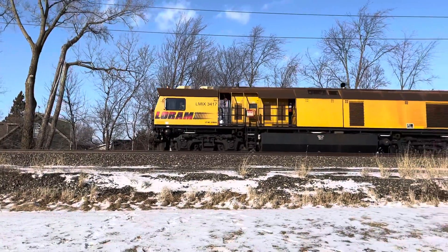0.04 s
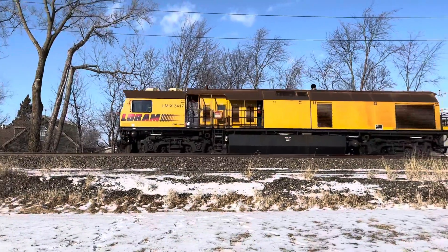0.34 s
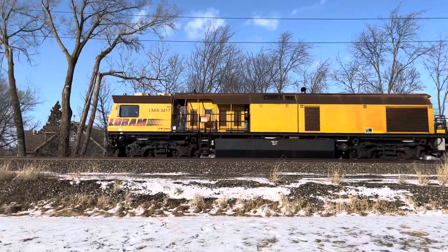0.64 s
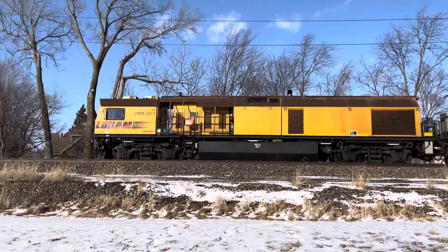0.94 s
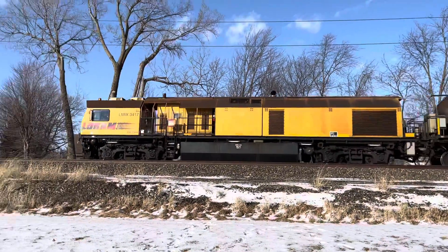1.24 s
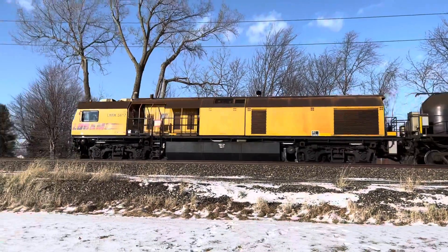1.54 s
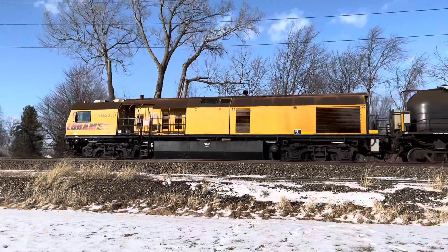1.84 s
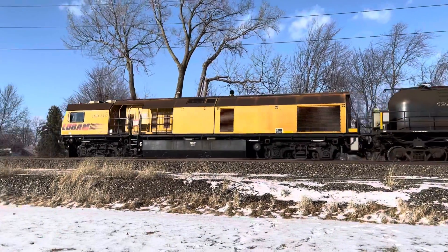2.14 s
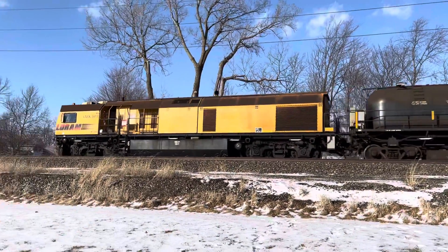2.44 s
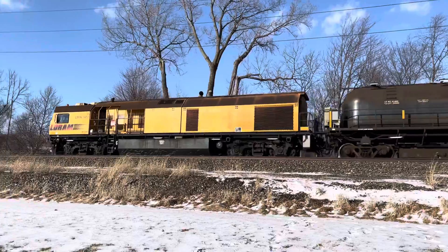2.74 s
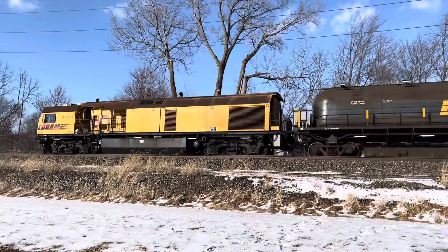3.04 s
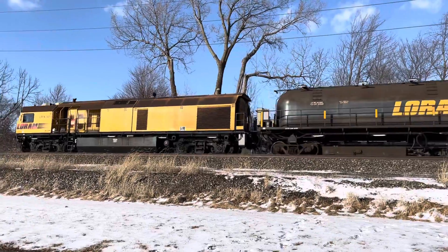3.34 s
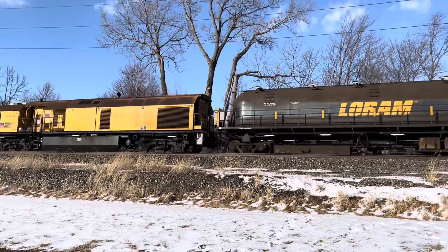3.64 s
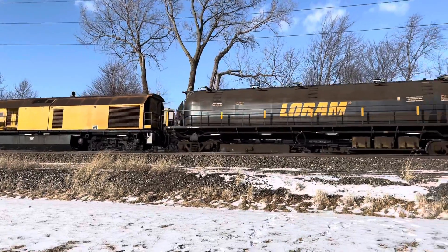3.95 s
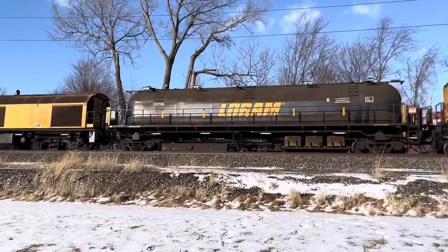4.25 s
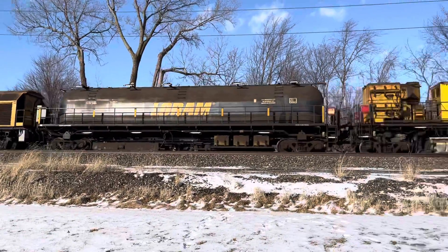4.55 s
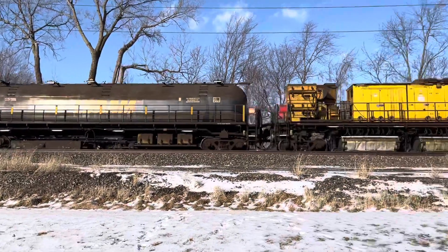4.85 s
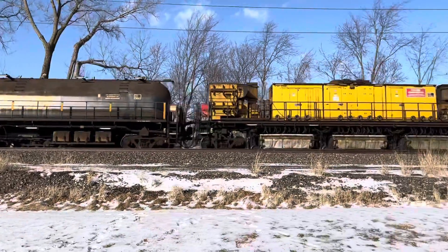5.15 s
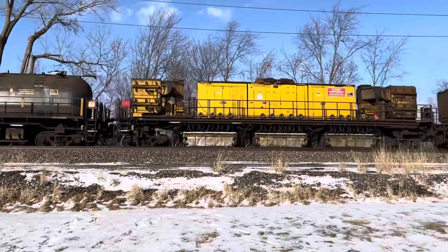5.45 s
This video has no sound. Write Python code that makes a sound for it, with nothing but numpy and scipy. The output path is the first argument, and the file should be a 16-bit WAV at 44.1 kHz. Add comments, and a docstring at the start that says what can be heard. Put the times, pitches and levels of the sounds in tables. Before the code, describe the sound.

A short gust of wind buffets the microphone and ends in a pop. A diesel locomotive passes in the open with a low, throbbing drone and roaring fans. Its running gear knocks and clanks early on, while steel wheels hiss, ring and scrape on the rails. Compressed air spurts briefly twice. As the following cars roll by, a generator's hum and buzz grow louder.

```python
"""Diesel work train passing

A locomotive, a water tank car and a machinery car with a generator roll across a snowy field.
A gust buffets the microphone and ends in a pop. The exhaust throbs at multiples of the crank rate,
fans and bodywork roar, wheels hiss, ring and scrape on the rails, and the running gear knocks.
Valves spurt compressed air; the generator's hum and buzz draw near last."""
import sys
import numpy as np
from scipy import signal
from scipy.fft import rfft, irfft, next_fast_len
from scipy.io import wavfile
from scipy.ndimage import map_coordinates

SR = 44100
rng = np.random.default_rng(int(sys.argv[2]) if len(sys.argv) > 2 else 0)


def store_wav(level_fs):
    """Save 16-bit WAV to argv[1]."""
    pcm = np.round(np.clip(np.atleast_2d(level_fs), -1, 1) * 32767)
    wavfile.write(sys.argv[1], SR, pcm.T.astype(np.int16))


N = 250929
TIME = np.arange(N) / SR
FFT_SIZE = next_fast_len(N, True)
BINS_HZ = np.maximum(np.arange(FFT_SIZE // 2 + 1) * SR / FFT_SIZE, 1)
SPEED_M_PER_S, DISTANCE_M, SOUND_M_PER_S = 5.0, 10.0, 343


def from_db(db):
    """Decibels to gain."""
    return 10 ** (np.asarray(db) / 20)


def unit_rms(x):
    """Scale to unit power."""
    return x / np.sqrt(np.mean(x ** 2) + 1e-20)


def by_hz(points):
    """A curve read at every frequency bin."""
    hz, value = np.transpose(points)
    return np.interp(np.log(BINS_HZ), np.log(hz), value)


def drift(rate_hz):
    """Slow random wander, rms 1."""
    spectrum = rfft(rng.standard_normal(FFT_SIZE)) / (1 + (BINS_HZ / rate_hz) ** 4)
    return unit_rms(irfft(spectrum, FFT_SIZE)[:N])


def swell(peak_s, half_length_s):
    """A smooth rise and fall of height 1."""
    return np.exp(-((TIME - peak_s) / half_length_s) ** 2)


def swells_db(rows):
    """Brief changes of level, summed."""
    return sum(db * swell(peak_s, half_length_s) for peak_s, half_length_s, db in rows)


def past_m(abreast_s):
    """How far a source has rolled beyond the microphone."""
    return SPEED_M_PER_S * (TIME - abreast_s)


def passing(abreast_s, level_db, focus):
    """Gain of a source going by; focus 1 spreads evenly, more beams sideways."""
    return from_db(level_db) * (DISTANCE_M / np.hypot(DISTANCE_M, past_m(abreast_s))) ** focus


def doppler_cycles(hz, abreast_s):
    """Cycles of a steady source as they arrive: sharp while it nears, flat once past."""
    return hz * (TIME - np.hypot(DISTANCE_M, past_m(abreast_s)) / SOUND_M_PER_S)


# Likeness of the two microphone ports: freq_hz, coherence (clipped to 0-1)
PORT_COHERENCE = [(60, 0.6), (125, 0.9), (250, 0.87), (500, 0.82), (1000, 0.46), (1450, 0.08), (2000, 0.95),
                  (4000, 0.72), (6500, 0.14), (8300, 2.5), (10000, -0.1), (12000, 1.5), (14000, 5)]

def noise(spectrum_db, flutter_db, coherence=PORT_COHERENCE):
    """Stereo turbulence of a given colour, fluttering in level; rms 1."""
    mid, side = rfft(rng.standard_normal((2, FFT_SIZE)))
    alike = np.clip(by_hz(coherence), 0, 1)
    ports = np.sqrt(1 + alike) * mid + np.sqrt(1 - alike) * side * [[1], [-1]]
    coloured = irfft(ports * from_db(spectrum_db), FFT_SIZE)[:, :N]
    return unit_rms(coloured * from_db(flutter_db * drift(rate_hz=21)))


def ring(force, hz, t60_s):
    """One damped mode; a unit click sets a sine of height 1 ringing."""
    radius, step_rad = from_db(-60 / (t60_s * SR)), 2 * np.pi * hz / SR
    feedback = [1, -2 * radius * np.cos(step_rad), radius ** 2]
    return signal.lfilter([0, np.sin(step_rad)], feedback, force + 1e-18)


def order_tone(cycles, order, wobble, wobble_hz=4):
    """One multiple of a machine's rate, wavering in phase and strength; rms about 1."""
    angle = 2 * np.pi * (order * cycles + rng.random()) + wobble * drift(wobble_hz)
    return np.sqrt(2) * np.sin(angle) * np.exp(.5 * wobble * drift(wobble_hz))


def overtones(cycles, orders, lifts, wobble, wobble_hz):
    """The tones of one shaft; now one, now another stands out."""
    out = 0
    for order, level_db in orders:
        lift_db = swells_db((s, half_s, db) for s, half_s, lifted, db in lifts if lifted == order)
        out = out + from_db(level_db + lift_db) * order_tone(cycles, order, wobble, wobble_hz)
    return out


# Gusts: peak_s, half_length_s, level_db
GUSTS = [(0.008, 0.036, -8), (0.062, 0.027, -13), (0.095, 0.021, -15), (0.149, 0.026, -14),
         (0.195, 0.022, -6.5), (0.237, 0.018, -13.5), (0.296, 0.026, -11), (0.345, 0.03, -15.5)]
# Eddy spectrum: freq_hz, density_db
WIND_SPECTRUM = [(20, -18), (40, -5), (75, 3.5), (120, 0.5), (180, -5.5), (260, -4), (350, -10.5),
                 (550, -13.5), (900, -22.5), (2000, -36.5), (5000, -72)]
# Likeness of the eddies at the ports: freq_hz, coherence
WIND_COHERENCE = [(50, 1), (130, 0.7), (400, 0.65)]
# Pops as the gust lets go: start_s, level_db
POPS = [(0.366, -10), (0.3694, 2.5), (0.3711, -5)]
# Pop resonances: pitch_hz, gain_db, t60_s
POP_MODES = [(560, -2, 0.0099), (1000, -2, 0.0042), (1400, -12, 0.003)]

def wind():
    """Lumpy eddies buffet the ports; the sharpest ones pop."""
    force = sum(from_db(db) * swell(peak_s, half_length_s) for peak_s, half_length_s, db in GUSTS)
    eddies = force * noise(by_hz(WIND_SPECTRUM), flutter_db=1, coherence=WIND_COHERENCE)
    clicks = np.zeros(N)
    for start_s, level_db in POPS:
        clicks[round(start_s * SR)] = from_db(level_db)
    pops = sum(from_db(db) * ring(clicks, hz, t60_s) for hz, db, t60_s in POP_MODES)
    soften = signal.butter(2, 2200, fs=SR, output="sos")
    return eddies + signal.sosfilt(soften, pops)


# Weaker tones of the uneven cylinders: order, level_re_drone_db
CRANK_ORDERS = [(2, -33), (3, -26), (7, -17.5), (8, -23.5), (9, -27.5), (11, -30.5), (12, -31), (16, -31.5),
                (17, -29), (21, -31), (24, -37)]
# Crank tones standing out: peak_s, half_length_s, order, lift_db
CRANK_LIFTS = [(3.5, 0.3, 24, 14), (4.053, 0.3, 16, 13.5), (4.294, 0.21, 12, 13.5)]
# Dips in the drone: centre_s, half_length_s, depth_db
DRONE_DIPS = [(0.02, 0.07, 17), (0.45, 0.12, 11.5), (3.99, 0.055, 2.5), (4.87, 0.085, 12), (5.27, 0.07, 8),
              (5.72, 0.15, 5)]
# Lulls in the throb: centre_s, half_length_s, depth_db
BEAT_DIPS = [(0.52, 0.1, 15), (2.6, 0.48, 7.5)]
# Exhaust gas spectrum: freq_hz, density_db
RUMBLE_SPECTRUM = [(20, -35), (35, -22), (46, -4), (62, -2), (85, 1), (115, -0.5), (150, -5.5), (200, -9.5),
                   (300, -29.5), (600, -82)]
# Swells in the rumble: peak_s, half_length_s, lift_db
RUMBLE_SWELLS = [(1.55, 0.17, 0.5), (1.85, 0.074, 5), (2.46, 0.081, 6.5), (4.85, 0.09, 0.5),
                 (5.67, 0.042, 6)]

def exhaust(crank_hz=14.93, drone_order=4, beat_order=5, abreast_s=2.283):
    """The drone beats once a turn against its neighbouring orders; gas puffs out of both engines."""
    turns = doppler_cycles(crank_hz, abreast_s)
    drone = order_tone(turns, drone_order, wobble=0.017)
    uneven = overtones(turns, CRANK_ORDERS, CRANK_LIFTS, wobble=0.12, wobble_hz=4)
    drone_gain = passing(abreast_s, level_db=-10.5, focus=1) * from_db(-swells_db(DRONE_DIPS))
    beat = order_tone(turns, beat_order, wobble=0.09)
    beat_gain = passing(abreast_s=2.44, level_db=-19, focus=0.88) * from_db(-swells_db(BEAT_DIPS))
    diesel_flow = passing(abreast_s=2.8, level_db=-23, focus=0.83)
    generator_flow = passing(abreast_s=5.6, level_db=-22, focus=3.6)
    flow = np.hypot(diesel_flow, generator_flow) * from_db(swells_db(RUMBLE_SWELLS))
    puffs = 1 + 0.2 * np.sin(2 * np.pi * drone_order * turns)
    rumble = flow * puffs * noise(by_hz(RUMBLE_SPECTRUM), flutter_db=0.5)
    return drone_gain * (drone + uneven) + beat_gain * beat + rumble


def echo_ripple_db(echo_db, count):
    """Short reflections off ballast and steel sides ripple the spectrum."""
    delays_s = rng.uniform(0.002964, .025, (count, 1))
    paths = 1 + from_db(echo_db) * np.exp(-2j * np.pi * BINS_HZ * delays_s).sum(axis=0)
    return 20 * np.log10(np.abs(paths) + 1e-3)


# Fan and panel spectrum: freq_hz, density_db
ROAR_SPECTRUM = [(90, -50), (170, -5), (260, -1), (400, -1.5), (520, -3.5), (750, -4), (950, -7.5),
                 (1500, -8.5), (2200, -9.5), (2900, -14.5), (4000, -25.5), (7000, -80)]
# Resonances of each part of the train: centre_hz, width_hz, peak_db
ENGINE_BAY = [(296, 19, 6), (380, 43, 2), (570, 33, 3), (728, 38, 0.5), (900, 81, -5.5), (1066, 510, 5),
              (1500, 60, -3), (2030, 100, 2.5), (2280, 110, -1), (2650, 230, 4), (2800, 120, -8)]
ENGINE_SIDE = [(300, 18, 3.5), (440, 130, 2), (574, 50, 3), (740, 56, 1.5), (910, 90, -6.5),
               (1110, 560, 2.5), (1500, 60, 1), (2030, 100, 2), (2280, 120, -1), (2640, 250, 4),
               (2760, 120, -4)]
RADIATOR = [(246, 25, 3.5), (400, 99, 1), (563, 50, 5.5), (650, 40, 4), (753, 60, 3.5), (835, 54, 2),
            (900, 70, -3), (1266, 260, 7), (1530, 110, -5), (1950, 200, 2.5), (2540, 290, 6),
            (3100, 120, 6), (3470, 220, 3.5), (3930, 180, -7)]
TANK_CAR = [(420, 200, -4.5), (575, 40, 5.5), (750, 70, 3), (844, 120, 3), (1170, 400, -2), (1980, 710, -7)]
MACHINE_CAR = [(398, 150, -1.5), (600, 70, -2), (730, 110, 2.5), (820, 240, 2), (1500, 320, 2),
               (2460, 370, 4)]
# The parts going by in turn: abreast_s, level_db, left_over_right_db
PART_PASSES = [(0.4, -25, -1), (1.501, -22.5, -2), (2.4, -24, -1), (3.4, -23, -1), (4.399, -25.5, 4),
               (5.4, -24.5, 1)]

def bodywork():
    """Fans and panels roar; each part colours the sound while abreast, then fades into the next."""
    parts = [ENGINE_BAY, ENGINE_BAY, ENGINE_SIDE, RADIATOR, TANK_CAR, MACHINE_CAR]
    abreast_s = [row[0] for row in PART_PASSES]
    out = 0
    for (_, level_db, pan_db), modes, own_turn in zip(PART_PASSES, parts, np.eye(len(parts))):
        peaks_db = sum(db / (1 + (2 * (BINS_HZ - hz) / width_hz) ** 2) for hz, width_hz, db in modes)
        colour_db = by_hz(ROAR_SPECTRUM) + peaks_db + echo_ripple_db(echo_db=-15.5, count=6)
        crossfade = np.sqrt(np.interp(TIME, abreast_s, own_turn))
        port_gains = from_db(level_db + pan_db * np.array([[.5], [-.5]]))
        out = out + crossfade * port_gains * noise(colour_db, flutter_db=0.5)
    return out


# Wheel groups going by: abreast_s, level_db
BOGIES = [(0, -35.5), (1.6, -34.5), (3.7, -36.5), (5.7, -30.5)]
# Rolling spectrum: freq_hz, density_db
ROLLING_SPECTRUM = [(1200, -28), (2300, -4.5), (3200, 1), (4000, 2), (4700, -3), (5500, -6.5), (7000, -14),
                    (8500, -67), (12000, -32)]

def wheel_hiss():
    """Steel rolls on rough steel, louder as each group of wheels goes by."""
    power = sum(passing(abreast_s, level_db, focus=5.6) ** 2 for abreast_s, level_db in BOGIES)
    return np.sqrt(power) * noise(by_hz(ROLLING_SPECTRUM), flutter_db=1.28)


# Lightly damped wheel modes: pitch_hz, width_hz, gain_db
WHEEL_MODES = [(1040, 42, 2), (1070, 86, -0.5), (1340, 66, 0), (1620, 31, -8), (1760, 44, -18),
               (1998, 39, -2), (2046, 35, -3), (2522, 29, -7), (2666, 38, -7), (3050, 34, -14)]

def wheel_ring(abreast_s=1.32):
    """Rail roughness keeps the locomotive's wheels ringing; they waver, and sink in pitch going by."""
    modes = 0
    for hz, width_hz, gain_db in WHEEL_MODES:
        tone = unit_rms(ring(rng.standard_normal(N), hz, t60_s=np.log(1000) / (np.pi * width_hz)))
        modes = modes + tone * from_db(gain_db + 1.4 * drift(rate_hz=4))
    shifted = map_coordinates(modes, [doppler_cycles(SR, abreast_s)], order=3, mode="mirror")
    return passing(abreast_s, level_db=-38.5, focus=3.7) * shifted


# Air hiss spectrum: freq_hz, density_db
HISS_SPECTRUM = [(3000, -27), (5500, -2), (7000, 4), (8500, 2), (10000, 3), (12500, -1), (13800, -5.5),
                 (15000, -19)]

def air_hiss(floor_db=-49):
    """A fine hiss that grows as the machinery car nears."""
    gain = np.hypot(from_db(floor_db), passing(abreast_s=6.6, level_db=-39, focus=2.14))
    return gain * noise(by_hz(HISS_SPECTRUM), flutter_db=0.8)


def blows(hits, spectrum, attack_s):
    """Each blow shakes many close modes at once: a burst of noise that dies away."""
    envelope = 0
    for start_s, level_db, decay_s in hits:
        age_s = np.maximum(TIME - start_s, 0)
        rise = 1 - np.exp(-age_s / attack_s)
        envelope = envelope + from_db(level_db) * rise * np.exp(-age_s / decay_s)
    return envelope * noise(by_hz(spectrum), flutter_db=0)


# Steel hits: start_s, level_db, decay_s
CLANKS = [(0.497, -23, 0.033), (0.74, -25.5, 0.063), (0.812, -37, 0.015), (0.955, -22, 0.019),
          (1.086, -32, 0.018), (1.408, -26, 0.025), (1.76, -37, 0.013), (2.2, -46, 0.024),
          (2.298, -35, 0.012), (2.431, -36, 0.015)]
# Loose steel spectrum: freq_hz, density_db
CLANK_SPECTRUM = [(900, -34), (1400, 10), (1720, 7), (1870, 4), (2020, 6), (2250, -11), (2600, -23),
                  (4500, -36)]

def clatter():
    """Loose steel clanks on the bogies."""
    return blows(CLANKS, CLANK_SPECTRUM, attack_s=0.0033)


# Scrapes and squeaks: peak_s, half_length_s, centre_hz, width_hz, level_db
SCRAPES = [(0.75, 0.27, 1470, 700, -32), (1.094, 0.028, 2005, 50, -30), (1.33, 0.05, 2660, 70, -36.5),
           (1.516, 0.075, 3700, 2000, -32.5), (1.66, 0.077, 1987, 60, -35), (1.68, 0.04, 4040, 1400, -36),
           (2.11, 0.025, 2030, 110, -32.5), (2.153, 0.12, 3000, 380, -35.5),
           (2.247, 0.33, 3670, 1300, -41.5), (2.217, 0.035, 1040, 90, -30), (2.285, 0.04, 2000, 80, -34),
           (2.84, 0.065, 3400, 2200, -34.5), (2.98, 0.074, 3900, 400, -39), (3.257, 0.053, 3200, 750, -32),
           (3.834, 0.12, 1360, 340, -30.5), (4.452, 0.64, 4200, 810, -40.5), (5.12, 0.16, 2410, 420, -37.5),
           (5.33, 0.26, 1500, 380, -35.5), (5.6, 0.07, 3900, 1600, -35)]

def scrapes():
    """Wheels grind on the rail in bands of noise that swell and fade."""
    out = 0
    for peak_s, half_length_s, centre_hz, width_hz, level_db in SCRAPES:
        band_db = -20 * np.log10(1 + (2 * (BINS_HZ - centre_hz) / width_hz) ** 4)
        out = out + from_db(level_db) * swell(peak_s, half_length_s) * noise(band_db, flutter_db=2)
    return out


# Running gear knocks: start_s, level_db, decay_s
KNOCKS = [(0.654, -16.5, 0.036), (0.735, -12.5, 0.015), (1.024, -10.5, 0.026), (1.335, -14, 0.028),
          (2.2, -18.5, 0.04), (2.423, -20, 0.032), (3.715, -21, 0.047)]
# Low frame resonances: freq_hz, density_db
FRAME_SPECTRUM = [(50, -20), (130, -9), (220, 0.5), (340, 1.5), (480, -9), (900, -17.5), (2500, -65)]

def knocks():
    """The running gear knocks dully on the frame."""
    return blows(KNOCKS, FRAME_SPECTRUM, attack_s=0.014)


def growl(level_db=-25.5):
    """Rough rail shakes the locomotive's frame for a moment."""
    shaking = from_db(level_db) * swell(peak_s=1.4, half_length_s=0.33)
    return shaking * noise(by_hz(FRAME_SPECTRUM), flutter_db=2)


# Blade tones: order, gain_db
FAN_ORDERS = [(1, -3.5), (2, -3), (3, -28)]
# Blade tones standing out: peak_s, half_length_s, order, lift_db
FAN_LIFTS = [(1.3, 0.29, 1, 4.5), (2.1, 0.3, 2, 1), (3.33, 0.22, 2, 5.2), (4.25, 0.23, 2, 4.4)]

def fan(blade_hz=289.5, abreast_s=1.9):
    """The locomotive's cooling fan chops unsteady air into a rough tone."""
    chops = doppler_cycles(blade_hz, abreast_s)
    tone = overtones(chops, FAN_ORDERS, FAN_LIFTS, wobble=0.4, wobble_hz=7.5)
    return passing(abreast_s, level_db=-35, focus=2) * tone


# Whine tones: order, gain_db
PUMP_ORDERS = [(5, -6), (6, -12)]
# Whine tones standing out: peak_s, half_length_s, order, lift_db
PUMP_LIFTS = [(1.9, 0.23, 5, 8.4), (3.2, 0.26, 5, 7.3), (3.8, 0.41, 6, 11)]

def pump(stroke_hz=145.3, abreast_s=3.1):
    """A thin whine at the locomotive's rear, likely a pump, shifts between two overtones."""
    strokes = doppler_cycles(stroke_hz, abreast_s)
    whine = overtones(strokes, PUMP_ORDERS, PUMP_LIFTS, wobble=0.2, wobble_hz=5)
    return passing(abreast_s, level_db=-37, focus=1) * whine


# Valve openings: start_s, length_s, edge_s, level_db, tilt_db_per_octave, top_hz
SPURTS = [(1.858, 0.038, 0.006, -36, 1.5, 15200), (1.882, 0.06, 0.02, -42, 1, 14500),
          (1.92, 0.14, 0.03, -36, 0, 13800), (2.02, 0.13, 0.043, -38, 1, 14300),
          (3.5, 0.3, 0.13, -38.5, 0, 14000)]
# Air jet spectrum: freq_hz, density_db
JET_SPECTRUM = [(2500, -25), (4500, 7), (7000, 6), (8500, 5), (10000, 2), (12500, 1), (14000, 5),
                (15000, 1)]

def air_spurts():
    """Valves open briefly on a very bright jet of compressed air."""
    out = 0
    for start_s, length_s, edge_s, level_db, tilt_db_per_octave, top_hz in SPURTS:
        opening = np.clip(np.minimum(TIME - start_s, start_s + length_s - TIME) / edge_s, 0, 1)
        roll_off_db = 30 * np.clip((BINS_HZ - top_hz) / 1000, 0, 2)
        colour_db = by_hz(JET_SPECTRUM) + tilt_db_per_octave * np.log2(BINS_HZ) - roll_off_db
        out = out + from_db(level_db) * opening * noise(colour_db, flutter_db=2)
    return out


# Hum tones: order, gain_db
GENERATOR_ORDERS = [(2, 1), (3, -1.5), (4, 0.5), (5, -4), (6, -9.5), (11, -16), (12, -14)]
# Hum tones standing out: peak_s, half_length_s, order, lift_db
GENERATOR_LIFTS = [(4.832, 0.064, 4, 6.5), (4.858, 0.084, 2, 14.5), (5.05, 0.36, 12, 13),
                   (5.182, 0.23, 5, 8.5), (5.568, 0.13, 4, 7.5)]
# Casing response: freq_hz, gain_db
CASING_SPECTRUM = [(900, -3), (1150, -13), (1320, -1), (1550, 1.5), (1750, -11), (2050, -12), (2350, -1),
                   (2600, -8)]

def generator(firing_hz=60.0, abreast_s=5.8):
    """A fast engine hums louder as its car draws near; each firing rattles the casing."""
    cycles = doppler_cycles(firing_hz, abreast_s)
    hum = overtones(cycles, GENERATOR_ORDERS, GENERATOR_LIFTS, wobble=0.4, wobble_hz=8)
    firings = cycles + 0.004 * drift(rate_hz=9)
    buzz = 0
    for order in range(15, 44):
        gain_db = np.interp(order * firing_hz, *np.transpose(CASING_SPECTRUM))
        buzz = buzz + from_db(gain_db) * np.sin(2 * np.pi * (order * firings + rng.random()))
    casing = passing(abreast_s=5.62, level_db=-31.5, focus=7.7) * unit_rms(buzz)
    return passing(abreast_s, level_db=-33, focus=2) * hum + casing


def from_bearing(stereo, left_lead_ms):
    """Sound from the side reaches one port later than the other."""
    left, right = stereo
    delayed_samples = np.arange(N) - left_lead_ms * SR / 1000
    return np.array([left, map_coordinates(right, [delayed_samples], order=3, mode="nearest")])


# Bearing of the body and running gear: time_s, left_lead_ms
BODY_BEARING = [(0, -0.0059), (1.5, 0.0081), (3.2, 0.067), (5.69, 0.047)]

def scene(port_spacing_ms=0.23):
    """Train and wind in the open; the exhaust stack crosses from right to left."""
    running_gear = knocks() + clatter() + wheel_hiss() + scrapes() + wheel_ring() + growl()
    stack_m = past_m(abreast_s=3.3)
    diesel = from_bearing(exhaust(), port_spacing_ms * stack_m / np.hypot(DISTANCE_M, stack_m))
    body_lead_ms = np.interp(TIME, *np.transpose(BODY_BEARING))
    body = from_bearing(bodywork() + fan() + pump() + running_gear, body_lead_ms)
    return diesel + body + air_hiss() + air_spurts() + generator() + wind()


# Level between the ports: freq_hz, left_over_right_db
PORT_BALANCE = [(100, 0), (300, 1.5), (850, 0), (1050, -1), (1550, -3.5), (1800, 1.5), (2400, 1), (2750, 4),
                (3300, -1.5), (4600, 2), (6300, 1.5)]
# Phase between the ports: freq_hz, right_lag_rad
PORT_PHASE = [(200, 0), (900, -0.5), (1200, -0.6), (1520, -1.7), (1800, -0.3), (3400, -0.2), (4500, -0.1),
              (5900, -0.9), (7200, -1.4), (7800, -3), (9000, -3.2), (9900, -5.6), (11000, -6.3),
              (13300, -6.4), (14100, -8.0), (15000, -7.9)]

def record(dry, fade_s=0.004, ceiling=0.95, cutoff_hz=15000):
    """The two ports differ in phase and level; the highest peaks are rounded and the top is cut."""
    fade = np.clip(np.minimum(TIME, TIME[-1] - TIME) / fade_s, 0, 1)
    balance = from_db(by_hz(PORT_BALANCE) / 2)
    response = [balance, np.exp(-1j * by_hz(PORT_PHASE)) / balance]
    ports = irfft(rfft(dry * fade, FFT_SIZE) * response, FFT_SIZE)[:, :N]
    rounded = ports / (1 + (ports / ceiling) ** 8) ** (1 / 8)
    return signal.sosfilt(signal.ellip(10, .1, 90, cutoff_hz, fs=SR, output="sos"), rounded)


dry = scene()
out = record(dry)
store_wav(out)
```